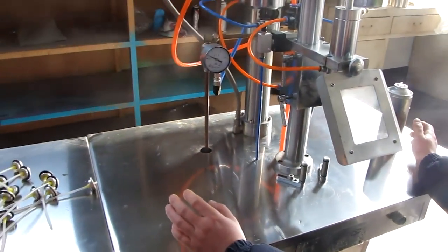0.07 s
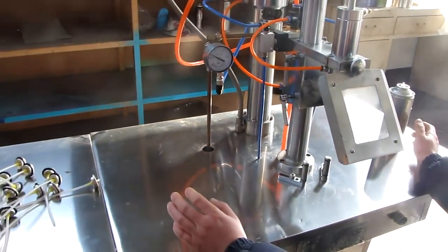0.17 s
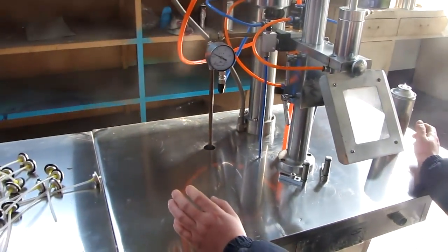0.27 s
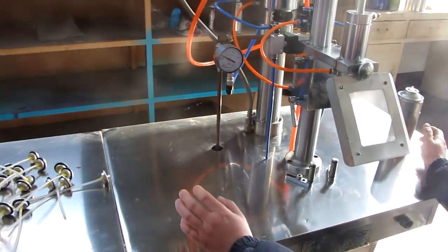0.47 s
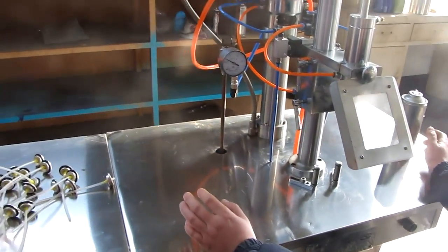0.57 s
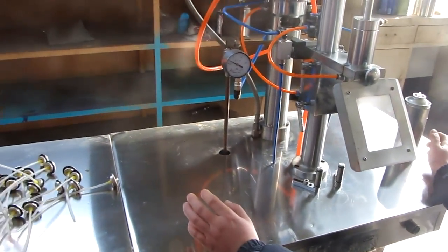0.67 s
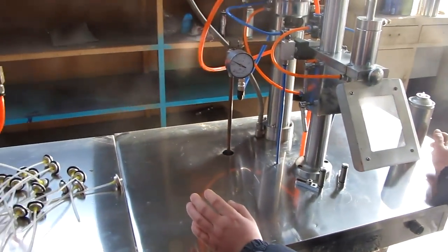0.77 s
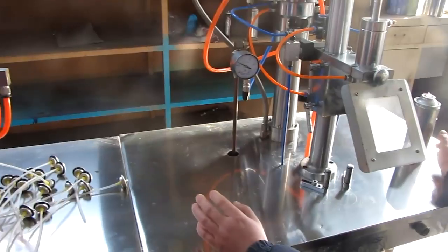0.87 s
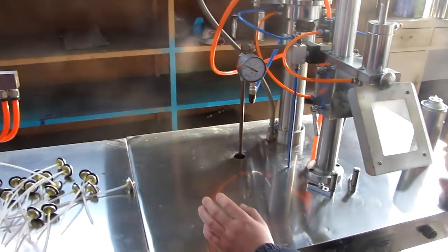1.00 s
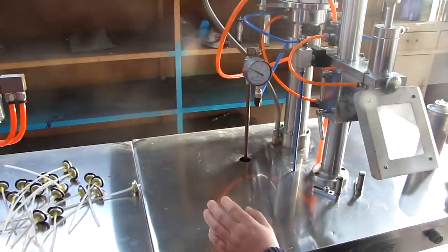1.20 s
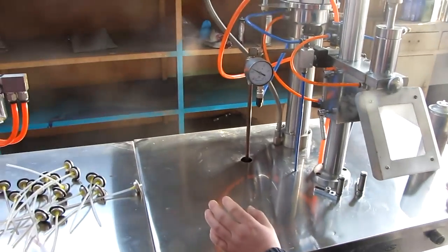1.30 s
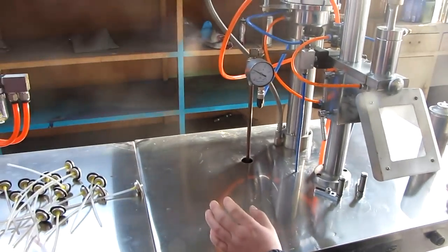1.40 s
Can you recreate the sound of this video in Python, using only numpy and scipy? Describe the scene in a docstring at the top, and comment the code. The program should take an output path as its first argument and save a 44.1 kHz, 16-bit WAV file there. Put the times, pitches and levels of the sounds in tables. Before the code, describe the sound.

After a quiet low hum and faint air leak, a piston pops and air rushes out, followed by a loud metal clack, sputtering spits and a dull final puff, heard close in a lightly reverberant workshop.

```python
"""A workshop where a pneumatic filling machine cycles, heard in stereo.
Its strokes end in pressure pops that ring the frame, and pistons knock on their stops as damped modes.
Six ports vent compressed air: each jet is coloured noise that excites narrow tube and frame resonances.
A low rumble, deep wavering tones, an air leak with a whine and a thin hiss lie underneath."""
import sys
import numpy as np
from scipy import signal
from scipy.fft import rfft, irfft
from scipy.io import wavfile
from scipy.ndimage import uniform_filter1d

SR = 44100
rng = np.random.default_rng(int(sys.argv[2]) if len(sys.argv) > 2 else 0)


def bounce(signal):
    """Save signal as a 16-bit WAV file at the path given by the first command-line argument."""
    frames = np.transpose(np.atleast_2d(signal))
    limited = np.clip(frames, -1, 1)
    pcm = np.round(limited * 32767).astype(np.int16)
    wavfile.write(sys.argv[1], SR, pcm)


def invert_db(level):
    """Linear amplitude ratio for a level in decibels (20 dB per decade), elementwise."""
    return 10 ** (np.asarray(level, dtype=float) / 20)


N = 63945
T = np.arange(N) / SR  # time [s]

# The ports in order: muffler, nozzle, return, vent, sigh, settle, as (sag while open [dB/s],
# fall once shut [dB/s], left over right [dB], treble build-up time [s], sputter [dB rms])
PORTS = [(42.2, 49, -0.5, 0.0076, 0.67), (29, 222, 4, 0.0007, 0.7), (32.4, 400, 2.5, 0.0014, 1),
         (150, 796, 1.5, 0.0012, 2), (8, 247, 1.5, .005, 1.4), (48, 159, -1, 0.0054, 1.5)]


def unit(x):
    """Normalisation: scale a signal to an rms of 1."""
    return x / np.sqrt(np.mean(x ** 2))


def noise():
    """White noise: independent samples carry equal power at every frequency."""
    return rng.standard_normal(N)


def shape(x, table):
    """Linear filtering: weight the spectrum by (frequency [Hz], gain [dB]) points on a log axis."""
    hz, db = np.array(table, float).T
    f = np.fft.rfftfreq(len(x), 1 / SR) + 1e-3
    gain_db = np.interp(np.log(f), np.log(hz), db, left=-90, right=-90)
    return irfft(rfft(x) * invert_db(gain_db), len(x))


def curve(table, fade):
    """Envelope: gain through (time [s], level [dB]) points, smoothed over fade [s]."""
    t, db = np.array(table, float).T
    return invert_db(uniform_filter1d(np.interp(T, t, db), int(fade * SR) + 1))


def walk(hz):
    """Random modulation: noise averaged twice over 1 / hz seconds, with an rms of 1."""
    window = int(SR / hz)
    return unit(uniform_filter1d(uniform_filter1d(noise(), window), window))


def ring(hz, width):
    """Resonance: noise through one mode of half-power width [Hz], with an rms of 1."""
    f = np.fft.rfftfreq(N, 1 / SR)
    response = 1 / (1 + 2j * (f - hz) / width)
    return unit(irfft(rfft(noise()) * response, N))


def modes(table):
    """Modal superposition: decaying sines from (frequency [Hz], level [dB], time to fall 60 dB [s])."""
    t = T[:SR // 2]
    return sum(invert_db(db) * np.sin(2 * np.pi * hz * t) * np.exp(-np.log(1000) * t / t60)
               for hz, db, t60 in table)


def clunks():
    """Air spring and modal response: each stroke ends in a pressure pop that rings the frame."""
    # (time [s], level of the pop before its edge and ring [dB], starting pitch [Hz], length [cycles])
    strokes = [(.217, -40, 198, 2.8), (.2374, -9.5, 105, 1.25), (0.2426, -6, 515, 0.85),
               (.392, -22, 232, 5.7), (.4099, -8, 510, 1.2), (.8222, -16, 420, 2.1),
               (.8698, -14.5, 400, 1.1), (1.193, -30, 210, 0.83)]
    # table and frame modes: (frequency [Hz], relative level [dB], time to fall 60 dB [s])
    frame_modes = [(127, 0.5, 0.54), (155, -5, 0.53), (268, 1, 0.175), (356, -26, 0.17), (492, 3.5, 0.21),
                   (643.6, 3.5, 0.3)]
    spring_hz, slide_s = 157.3, 0.0018  # pitch of the cylinder's air spring, time constant of the slide
    pop_edge = 1.6  # drive into tanh, which steepens the pop
    ring_db, ring_law = 2, 1.8  # ring against pop at 100 Hz, power by which it falls with pitch
    t = T[:SR // 2]
    frame = modes(frame_modes)
    frame = frame / abs(frame).max()
    out = np.zeros(N + SR)
    for start, db, hz, cycles in strokes:
        rest_hz = min(hz, spring_hz)
        # phase in cycles, the integral of a pitch that slides down to rest_hz
        turns = rest_hz * t + (hz - rest_hz) * slide_s * (1 - np.exp(-t / slide_s))
        progress = np.minimum(turns / cycles, 1)
        envelope = np.sin(np.pi * progress ** 0.82) ** 0.5
        pop = np.tanh(pop_edge * np.sin(2 * np.pi * turns)) * envelope
        # deep pops ring the frame most; the ring builds up during the pop
        frame_ring = invert_db(ring_db) * (100 / hz) ** ring_law * progress * frame
        out[int(start * SR):][:len(t)] -= invert_db(db) * (pop + frame_ring)
    return out[:N]


def knocks():
    """Impact excitation: pistons strike metal stops, and coming to rest there chokes the ring."""
    # (time [s], level before choking [dB peak], pitch [Hz])
    impacts = [(.2385, -23, 1200), (.4099, -3.5, 1270), (.4212, -17, 1700), (.549, -24, 1500),
               (.82225, -10.5, 1450), (.8322, -17, 1500), (.8703, -17, 630)]
    # modes of a knock: (multiple of its pitch, relative level [dB], time to fall 60 dB [cycles of the mode's
    # own frequency])
    knock_modes = [(1.0, 0, 24), (1.72, -6, 22)]
    choke_cycles = 2.6
    t = T[:SR // 2]
    out = np.zeros(N + SR)
    for start, db, hz in impacts:
        knock = modes([(k * hz, mode_db, cycles / (k * hz)) for k, mode_db, cycles in knock_modes])
        choke = np.exp(-(t * hz / choke_cycles) ** 4)
        out[int(start * SR):][:len(t)] -= invert_db(db) * choke * knock / abs(knock).max()
    return out[:N]


def flow(bursts, sag, fall):
    """Reservoir discharge: a burst rises, sags with tank pressure and dies away once its valve shuts."""
    power = 0
    for start, rise, db, hold in bursts:
        opening = np.clip((T - start) / rise, 0, 1)
        sag_db = sag * np.clip(T - start, 0, hold)
        fall_db = fall * np.maximum(T - start - hold, 0)
        power = power + (opening * invert_db(db - sag_db - fall_db)) ** 2
    return np.sqrt(power)


def jet(colour, rings, gain, lag, sputter_db):
    """Turbulent jet noise: low and high halves sputter apart, and resonances come and go."""
    wander_db, wander_hz = 3.5, 22  # rms swing and rate of each resonance's own level
    sputter_hz, bass_law = 140, 0.45  # rate of sputter, extra power of the flow in the bass
    hiss = unit(shape(noise(), colour))
    resonances = sum(invert_db(db) * unit(ring(hz, width) * invert_db(wander_db * walk(wander_hz)))
                     for hz, width, db in rings)
    hiss = unit(hiss + resonances)
    low = signal.sosfilt(signal.butter(2, 3300, fs=SR, output="sos"), hiss)
    high = hiss - low
    # the bass falls faster than the rest as the flow drops
    bass = signal.sosfilt(signal.butter(2, 900, fs=SR, output="sos"), low)
    low = low - bass * (1 - (gain / gain.max()) ** bass_law)
    # the treble builds up late but falls with the flow
    k = 1 / (lag * SR)
    late_gain = np.minimum(gain, signal.lfilter([k], [1, k - 1], gain))
    low = low * gain * invert_db(sputter_db * walk(sputter_hz))
    return low + high * late_gain * invert_db(sputter_db * walk(sputter_hz))


def port(bursts, colour, rings, settings):
    """Intensity panning: one port's jet follows its flow and is placed by a level difference."""
    sag, fall, pan_db, lag, sputter_db = settings
    air = jet(colour, rings, flow(bursts, sag, fall), lag, sputter_db)
    return air * invert_db(np.array([[pan_db], [-pan_db]]) / 2)


# In every port below: bursts (opens [s], rise [s], level before sag [dB], open for [s]),
# colour (frequency [Hz], relative level [dB]), rings (frequency [Hz], width [Hz], level to hiss [dB])


def muffler():
    """Broadband turbulence: one long burst whose resonances lie just above 2 kHz."""
    bursts, colour, rings = [(.2385, 0.0016, -15, 0.86)], [(200, -15), (420, -2.5), (800, -2), (1500, 0.5),
                                                     (2000, -0.5), (2900, -0.5), (3500, 0), (4700, 0),
                                                     (6000, -2), (13900, -9), (15700, -14)], [(2015, 85, -13),
                                                                             (2168, 64, -15),
                                                                             (2360, 70, -9.5),
                                                                             (2585, 38, -13),
                                                                             (2815, 61, -11.5)]
    return port(bursts, colour, rings, PORTS[0])


def nozzle():
    """Jet noise: a burst brightest near 12 kHz, with two resonances."""
    bursts, colour, rings = [(.410, 0.002, -20, 0.245)], [(1500, -16), (3000, -6.5), (4500, -0.5), (5500, -9),
                                                    (9300, -8.5), (10100, -13), (10600, -3), (11300, 1.5),
                                                    (12300, 4.5), (13400, -6), (14200, -2), (15700, -5.5)], [(10040, 200, -14),
                                                                           (4470, 340, -15)]
    return port(bursts, colour, rings, PORTS[1])


def return_port():
    """Resonant jet noise: three bursts, strongest in the middle register."""
    bursts, colour, rings = [(.635, 0.0057, -29, 0.095), (.78, 0.018, -34.5, 0.051),
                             (.825, 0.0038, -20, 0.06)], [(290, -52), (500, -14), (737, -11.5), (1410, 1.5),
                                                    (2200, 0.5), (2890, 4), (4850, 7.5), (6020, -5.5),
                                                    (9280, -9.5), (14100, -6), (15600, -34)], [(1395, 37, -14.5),
                                                                           (2820, 90, -21), (4560, 85, -11)]
    return port(bursts, colour, rings, PORTS[2])


def vent():
    """Resonant jet noise: four short high spits with broad resonances near 10 kHz."""
    bursts, colour, rings = [(.817, 0.003, -24.5, 0.018), (.856, 0.0091, -21, 0.011),
                             (.869, .002, -22.5, .013), (.885, 0.0018, -17.5, 0.02)], [(4000, -12), (7000, -6.5), (9300, -22), (10200, -6),
                                                  (11100, -3), (13000, -6), (15700, -15)], [(9300, 720, 2.5), (10900, 350, -3)]
    return port(bursts, colour, rings, PORTS[3])


def sigh():
    """Turbulence with a slow onset: one soft breath of air, fullest near 1.3 kHz."""
    bursts, colour, rings = [(1.015, 0.03, -33, 0.052)], [(590, -13), (1000, -5), (1300, 2), (1840, -4), (2230, -3),
                                                  (3750, -1.5), (5600, -7.5), (9500, -36), (15600, -23)], [(3700, 340, -4), (9470, 150, -18.5)]
    return port(bursts, colour, rings, PORTS[4])


def settle():
    """Low-frequency turbulence: a last dull puff without resonances."""
    bursts, colour = [(1.098, 0.0066, -32.5, 0.052)], [(240, -22), (400, 0.5), (624, -12.5), (785, -4.5), (988, -9),
                                             (2800, -3.5), (3520, -11), (5410, -16), (15600, -59)]
    return port(bursts, colour, [], PORTS[5])


def echo(x, t60):
    """Diffuse reverberation: convolve with a noise tail of unit energy that falls 60 dB in t60 [s]."""
    tail = rng.standard_normal(SR // 2) * np.exp(-np.log(1000) * T[:SR // 2] / t60)
    return signal.fftconvolve(x, tail / np.sqrt(np.sum(tail ** 2)))[:N]


def room(near):
    """Reverberant field: coloured reflections of the machine, equal on both channels."""
    # (frequency [Hz], gain [dB])
    room_colour = [(20, -25), (300, 0), (3000, 3.5), (16000, -2.5)]
    return invert_db(-8) * shape(echo(near.mean(axis=0), 0.12), room_colour)


def scatter(both):
    """Decorrelation: a short diffuse tail enters the two channels with opposite signs."""
    # (frequency [Hz], side over middle [dB])
    spread = [(25, -23), (200, -18.5), (500, -13), (1000, -8.5), (2000, -6), (3200, 3), (3700, -16),
              (4200, -15.5), (16000, -37)]
    side = shape(echo(both.mean(axis=0), 0.058), spread)
    return side * np.array([[1], [-1]])


def rumble():
    """Narrow-band beating: wavering hum within low noise, dipping at times while the air blows."""
    # (time [s], level [dB])
    rumble_level = [(0, -46.5), (.22, -41.5), (.38, -30), (.5, -50), (.61, -35), (.7, -44), (.9, -36),
                    (.96, -44.5), (1.06, -44.5), (1.08, -37.5), (1.45, -38)]
    # (frequency [Hz], relative level [dB])
    rumble_colour = [(15, -41), (25, -17), (65, -15.5), (97, -8), (135, -2), (177, -9.5), (362, -12),
                     (484, -22), (588, -20.5), (1200, -26), (1560, -65), (2640, -120)]
    # (frequency [Hz], width [Hz], level against the noise [dB])
    hum_bands = [(116.3, 19, -4), (184.7, 22, -6.5)]
    hum = sum(invert_db(db) * ring(hz, width) for hz, width, db in hum_bands)
    body = unit(unit(shape(noise(), rumble_colour)) + hum)
    throb = invert_db(0.41 * walk(20))
    return body * throb * curve(rumble_level, 0.01)


def wobble():
    """Random-phase resonances: deep wavering tones hold at first, then decay exponentially."""
    # (frequency [Hz], width [Hz], level while held [dB])
    tones = [(47.7, 64, -40), (255, 150, -38.5)]
    decay_db = 300 * np.maximum(T - 0.32, 0)  # 300 dB/s after 0.32 s
    return sum(ring(hz, width) * invert_db(db - decay_db) for hz, width, db in tones)


def leak():
    """Turbulent leakage: a faint air hiss with a thin whine that weakens against it."""
    # (time [s], level of the hiss [dB])
    leak_level = [(0, -40.5), (.23, -42), (1.0, -35), (1.2, -46), (1.3, -46), (1.45, -48)]
    # (frequency [Hz], relative level [dB])
    leak_colour = [(400, -8), (855, -16), (1290, -4), (2500, -3), (3990, -5), (5450, -8.5), (6250, -11),
                   (9000, -14.5), (15700, -47)]
    whine = invert_db(-10 - 23 * T) * ring(1219, 6.9)  # level against the hiss, falling 23 dB/s
    return (unit(shape(noise(), leak_colour)) + whine) * curve(leak_level, 0.01)


def fizz():
    """High-frequency noise: a thin hiss that all but pauses near the end."""
    # (time [s], level [dB])
    fizz_level = [(0, -56), (1.15, -51.5), (1.22, -75), (1.34, -71), (1.39, -57.5), (1.45, -60)]
    hiss = unit(shape(noise(), [(5000, -20), (9300, 3), (15700, -7)]))
    return hiss * curve(fizz_level, 0.02)


def scene():
    """Linear superposition: machine, room and background add, then the channels are decorrelated."""
    air = muffler() + nozzle() + return_port() + vent() + sigh() + settle()
    near = clunks() + knocks() + air
    background = rumble() + wobble() + leak() + fizz()
    both = near + room(near) + background
    return both + scatter(both)


def top_cut(x):
    """Nothing passes above the cut-off."""
    return signal.sosfilt(signal.butter(12, 15720, fs=SR, output="sos"), x)


def record(dry):
    """Band-limiting and clipping: the camera cuts the top and clips peaks beyond full scale."""
    low_pass = signal.ellip(10, 0.2, 80, 15700, fs=SR, output="sos")
    cut = signal.sosfilt(low_pass, dry)
    return top_cut(np.clip(cut, -1, 1))


dry = scene()
out = record(dry)
bounce(out)
```